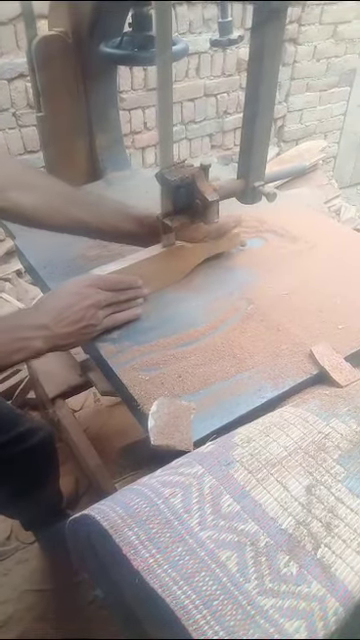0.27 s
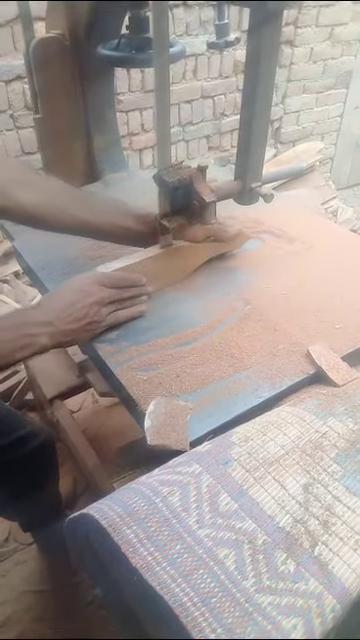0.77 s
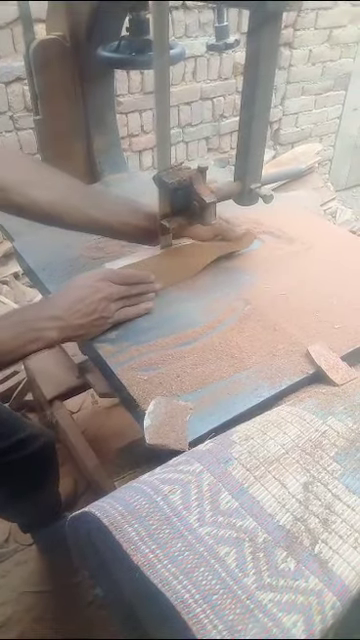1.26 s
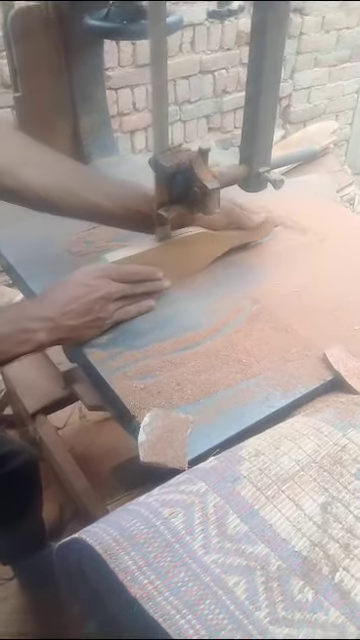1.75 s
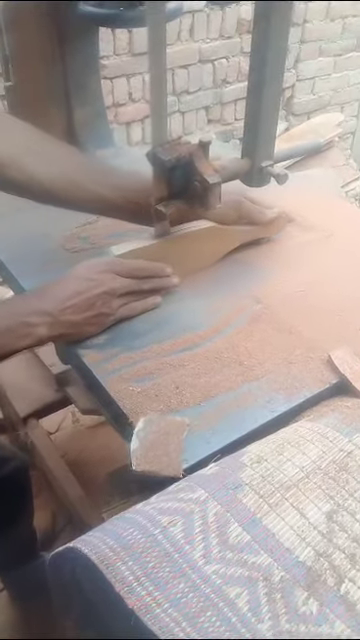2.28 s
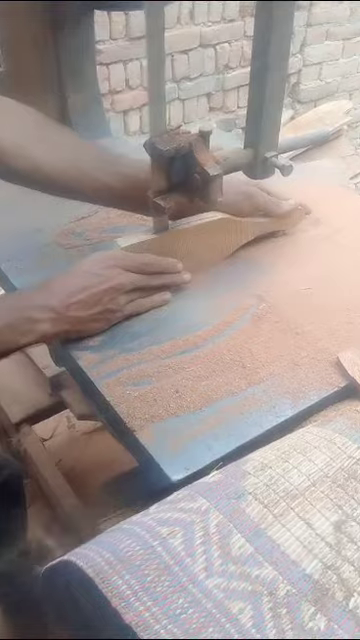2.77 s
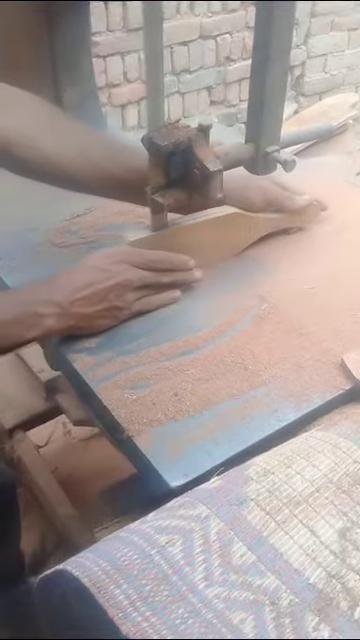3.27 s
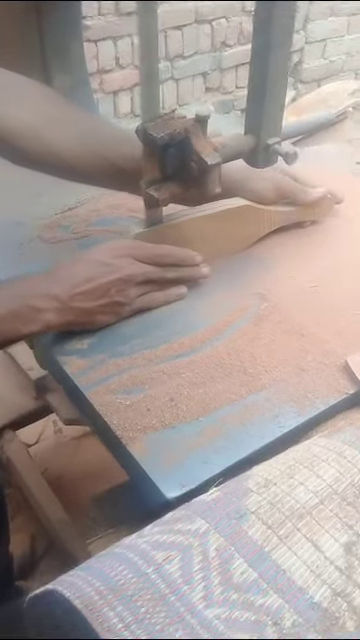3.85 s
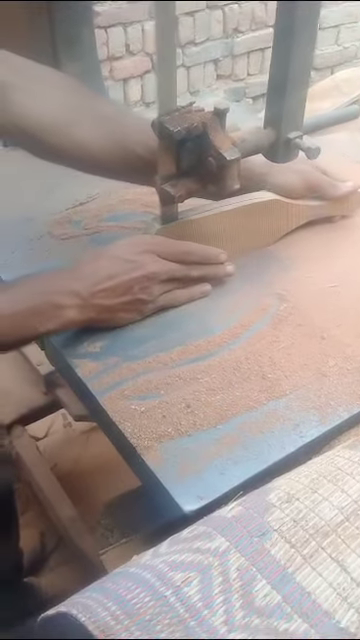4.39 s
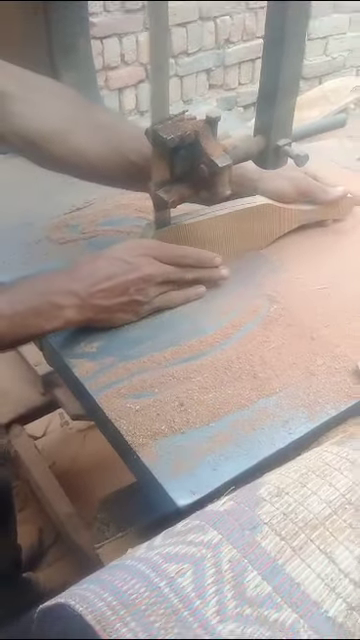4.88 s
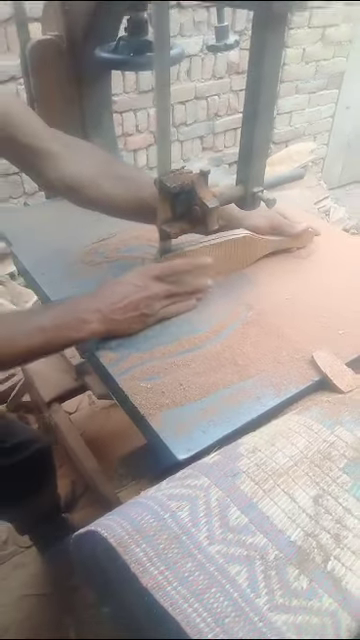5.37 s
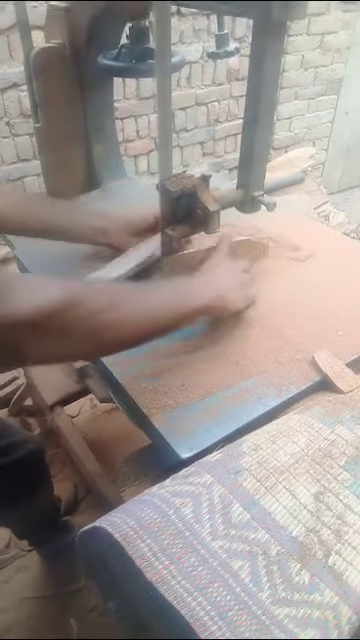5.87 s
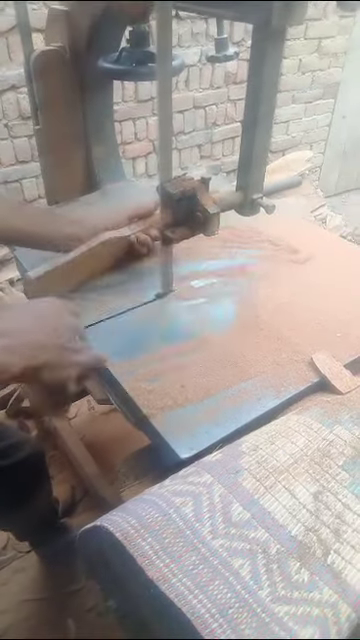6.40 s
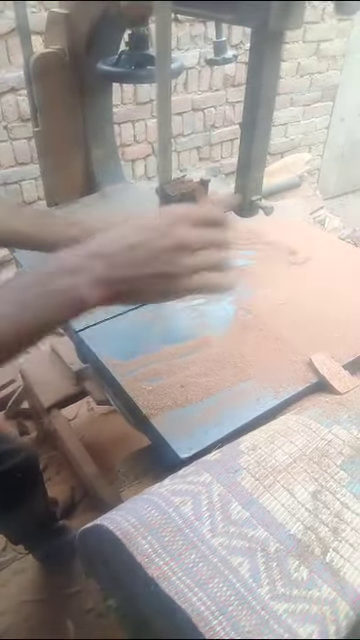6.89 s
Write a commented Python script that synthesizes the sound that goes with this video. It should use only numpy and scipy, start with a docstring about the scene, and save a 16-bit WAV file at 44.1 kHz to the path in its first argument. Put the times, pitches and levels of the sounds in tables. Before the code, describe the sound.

Close and dry on a phone: bandsaw teeth tear hardwood in uneven bursts, the ringing tone shifting as the cut moves, with low table shudder and gritty hiss. After a few seconds it eases to rattling frame, wavering hum and thin metallic squeaks. A loud double wooden clack and a softer, lower knock follow, then harsh cutting returns to the end.

```python
"""Band saw in a small workshop

A large band saw in a small brick workshop, on one phone microphone; levels are as they reach it, with no echo.
The blade bites into a hardwood blank, stutters, runs free while two offcuts knock, and bites again.
Random scratches, coloured by resonances, make the frame's rattle, the guides' scrape and the teeth's cut;
the motor hums as a wavering sine and offcuts ring as fading sines. The sound drops out near the start."""
import sys
import numpy as np
from scipy import signal
from scipy.fft import rfft, irfft, next_fast_len
from scipy.io import wavfile
from scipy.ndimage import uniform_filter1d

SR = 44100
rng = np.random.default_rng(int(sys.argv[2]) if len(sys.argv) > 2 else 0)


def master_out(mix):
    """Clip the mix to full scale and print it as 16-bit PCM to the path in sys.argv[1]."""
    frames = np.transpose(np.atleast_2d(mix))
    ceiling = np.clip(frames, -1, 1)
    pcm = np.round(ceiling * 32767).astype(np.int16)
    wavfile.write(sys.argv[1], SR, pcm)


N = 314874  # samples

# Spectra and modes below give relative levels: each coloured sound is scaled to rms 1 afterwards.
# Frame, wheels and motor running free, broad spectrum: pitch_hz, level_db (per Hz)
FRAME_SPECTRUM = [(15, -73), (25, -60), (98, -18), (171, -6.5), (220, -3.5), (358, -5.5), (785, -3.5),
                  (1060, 5.5), (1280, 0.5), (2940, -1), (3370, -0.5), (5880, -13), (6300, -16), (8190, -40),
                  (13900, -120)]
# Frame resonances: pitch_hz, width_hz, level_db
FRAME_MODES = [(100, 17, -3.5), (121.7, 15, -2), (506, 70, -1), (889, 62, 3.5), (1040, 52, 5),
               (1120, 150, 1.5), (1165, 57, 0), (1410, 74, 2.5), (1525, 69, 4.5), (1674, 54, 6.5),
               (2082, 62, 3.5), (2305, 390, 1), (3273, 86, 1.5), (3385, 44, 6), (3474, 38, 5),
               (4450, 580, 0)]
# Level of the frame's rattle: time_s, level_db
RATTLE_LEVEL = [(3.5, -24.5), (3.9, -22.5), (4.45, -23), (5.3, -22.5), (6.3, -24)]
# Wavering level of the motor hum: time_s, level_db (rms)
HUM_LEVEL = [(0.15, -37), (0.34, -41), (0.4, -51), (0.5, -34), (0.73, -41.5), (0.95, -34), (1.14, -41),
             (1.18, -47), (1.41, -35), (2.25, -47.5), (2.45, -32), (2.56, -47), (2.95, -34), (3.09, -44),
             (3.21, -30), (3.26, -48), (3.4, -36), (3.56, -48), (3.67, -34), (3.91, -35), (3.96, -45),
             (4.39, -60), (4.51, -40.5), (5.85, -37), (6.58, -48.5), (6.81, -68), (6.89, -48),
             (7.14, -43.5)]
# Blade rubbing through its guides, broad spectrum: pitch_hz, level_db (per Hz)
GUIDE_SPECTRUM = [(6200, -31), (6400, -7.5), (6900, -8), (7400, 2), (8700, -1), (11400, -9), (13400, -7),
                  (14000, -6)]
# Guide resonances: pitch_hz, width_hz, level_db
GUIDE_MODES = [(8000, 120, 6), (8560, 70, 2), (8760, 180, 0), (10600, 80, -6), (12700, 100, -16)]
# Rubbing in the guides before flutter: time_s, scrape_db
RUB_LEVEL = [(3.3, -33), (3.5, -28.5), (3.62, -44), (3.95, -30), (4.1, -29.5), (4.6, -30.5), (5.2, -27),
             (5.5, -29), (5.85, -32), (6.4, -29)]
# Wood fibres tearing, broad spectrum: pitch_hz, level_db (per Hz)
TEARING_SPECTRUM = [(300, -41), (700, -16), (1000, 2), (1500, 10), (2050, 2.5), (2700, 6.5), (3200, -3),
                    (3900, 1), (4600, -3), (5100, -16.5), (6000, -16.5), (7800, -48)]
# Blank shaking the table, broad spectrum: pitch_hz, level_db (per Hz)
THUD_SPECTRUM = [(25, -38), (60, -18.5), (150, -5.5), (300, -0.5), (500, -0.5), (750, -1.5), (1100, -17.5)]
# Table resonances: pitch_hz, width_hz, level_db
TABLE_MODES = [(410, 10.7, 9.5), (540, 27, 7.5)]
# Teeth scraping in the kerf, broad spectrum: pitch_hz, level_db (per Hz)
KERF_SPECTRUM = [(2820, -60), (4800, -12), (5140, -9.5), (5990, -6.5), (6610, -6), (7210, -5.5), (7790, 3),
                 (8170, 2.5), (9110, -3.5), (11600, -10), (13500, -5)]
# Kerf resonances: pitch_hz, width_hz, level_db
KERF_MODES = [(6840, 240, 0), (7900, 150, -10), (7660, 120, -4.5), (8520, 110, 1.5), (10100, 280, -1.5)]
# Offcuts knocking on the table: start_s, peak_db, pitch_factor
KNOCKS = [(4.2941, -2, 1.0), (4.2965, -7, 1.0), (5.0403, -10, .57)]
# Ringing of an offcut at pitch factor 1: pitch_hz, level_db (relative), t60_s (time to fall 60 dB)
OFFCUT_MODES = [(937, -13, .055), (1350, 0, .009), (2250, -3, .009)]
# Resonances where the band sings: pitch_hz, width_hz, level_db
SINGING_MODES = [(6562, 91, -7), (6673, 53, -7.5), (6970, 320, -13.5)]
# Topmost sizzle of guides and kerf, broad spectrum: pitch_hz, level_db (per Hz)
SIZZLE_SPECTRUM = [(12000, -32.5), (13500, 2), (14200, 0), (14800, 8), (15200, 7), (15800, 8)]
# Resonances of blank and blade that swell and fade as the kerf moves (the two times may be in either order):
# start_s, end_s, middle_hz, width_hz (nominal), level_db (over the tearing)
KERF_RINGS = [(-.3, .6, 2955, 120, -6), (-.2, .7, 1322, 40, -2.5), (-.2, .7, 1830, 90, -3.5),
              (-.2, 0.97, 1470, 100, 1), (.1, 1, 2710, 80, -8), (.3, 1.9, 2340, 100, -7.5),
              (.35, 1.5, 1343, 50, 0), (.45, 0.84, 4140, 100, -7), (.8, 1.3, 3910, 120, -10),
              (.5, 2.5, 10970, 260, -13.5), (.75, 1.6, 1477, 370, 0.5), (.75, 2, 1780, 95, -2),
              (1.1, 2.4, 1915, 60, -9.5), (1.3, 2.2, 2770, 365, -7.5), (1.4, 2.6, 1150, 70, -1),
              (1.5, 3.2, 893, 160, -5), (1.7, 3.6, 3540, 270, -6.5), (1.9, 2.6, 2410, 140, -5),
              (2., 2.76, 2150, 100, -4.5), (2.6, 3.1, 1330, 100, -4.5), (2.7, 3, 1125, 60, -2.5),
              (1.6, 2.9, 4540, 250, -10), (2.8, 3.3, 4580, 200, -6), (3.3, 3.65, 3470, 150, -1.5),
              (3.33, 3.4, 2215, 150, -2), (3.33, 3.8, 2730, 215, 2.5), (6.3, 6.75, 1476, 50, -2.5),
              (6.3, 6.75, 4720, 340, -4), (6.3, 6.9, 2980, 120, -2.5), (6.65, 7.3, 2875, 160, 0),
              (6.3, 7, 3770, 175, -3.5), (6.35, 7, 1850, 80, -4), (6.4, 7.1, 2410, 120, -4),
              (6.7, 7.4, 796.6, 25, -6.5), (6.7, 6.9, 1580, 80, -1.5), (6.8, 6.4, 4550, 365, -1.5),
              (6.5, 7.4, 5580, 490, -6.5), (1.4, 2.3, 1410, 45, -7.5), (2.8, 3.4, 5650, 250, -21),
              (-.2, 1.6, 1128, 25, -10.5)]
# The band presses on a guide: middle_s, scrape_db, sizzle_db
FLARES = [(3.39, -27, -32), (3.68, -30, -32), (4.2, -38, -33), (4.52, -30, -33), (4.7, -43, -35),
          (5.17, -25, -29), (5.44, -32, -27), (5.76, -28, -28), (6.0, -26, -31), (6.13, -40, -33),
          (6.26, -32, -35)]
# Bursts of singing, before flutter: middle_s, level_db
SQUEAKS = [(3.47, -28), (3.81, -30), (4.08, -22.5), (4.22, -29), (4.41, -25.5), (4.53, -28), (4.67, -30),
           (5.77, -30), (6.41, -26)]
# Steady feed under the bites, before judder: time_s, wood_db, thud_db, hiss_db, sizzle_db (over hiss)
FEED = [(0, -17.5, -37, -21, -2), (.3, -20, -38, -24, 1), (.47, -18, -35, -24, 3), (.6, -16, -28.5, -20, 0),
        (0.999, -17, -33.5, -22, 3), (1.5, -17.5, -31, -20.5, 0), (1.84, -16, -32, -20.5, 0),
        (1.86, -23, -42, -22, -3), (2.06, -24.5, -49, -30.5, 0), (2.36, -21.5, -46, -24, 2),
        (2.55, -21.5, -34, -23.5, -1), (2.69, -28, -44, -25, -1), (2.8, -20, -27, -20, -6),
        (2.866, -26, -36, -24, -3), (2.901, -21.5, -32.5, -20.5, 0), (3.26, -20, -34, -17.5, -6),
        (3.33, -39, -55, -40, -5), (3.6, -43.5, -55, -42, -8), (3.7, -70, -70, -70, 0),
        (6.3, -70, -70, -70, 0), (6.36, -33, -60, -31, -10), (6.41, -18, -48, -26, -2),
        (6.62, -18, -45, -23, 3), (6.65, -23, -37, -27, 7), (6.9, -23, -42, -27, 6),
        (7.001, -23, -43, -32, 10), (7.14, -19, -40, -24, 10)]
# The teeth bite harder, before judder: start_s, hold_s, wood_db, thud_db, hiss_db
BITES = [(0, .04, -18.5, -34, -20.5), (0.123, 0.061, -16, -32, -20.5), (0.207, 0.0088, -20, -24.5, -30),
         (0.311, 0.12, -15, -31.5, -22), (0.507, 0.09, -18, -35, -24), (0.749, 0.033, -24, -38, -30),
         (0.817, 0.048, -16.5, -28, -21), (0.918, 0.052, -17, -31, -30), (1.111, 0.076, -20, -32, -28),
         (1.25, 0.014, -21, -29, -31.5), (1.478, 0.032, -19, -36, -22.5), (1.58, 0.013, -19.5, -28, -23),
         (1.82, 0.016, -32, -30, -35), (1.914, 0.06, -17, -31, -20.5), (2.1, 0.062, -14.5, -26.5, -20.5),
         (2.273, 0.016, -14.5, -30, -22), (2.382, 0.061, -19, -29, -23), (2.447, 0.033, -14, -21.5, -26),
         (2.573, 0.048, -14, -26, -21), (2.73, 0.031, -15.5, -26, -19), (2.867, 0.0078, -19.5, -30, -20),
         (3.216, 0.034, -22, -26, -27), (3.362, 0.062, -22.5, -41, -25), (3.48, 0.037, -20, -46, -31),
         (6.447, 0.021, -18, -45, -22), (6.559, 0.044, -17, -36, -22), (6.674, .015, -18.5, -32, -30),
         (6.715, .02, -18, -32, -26), (6.776, 0.011, -19, -40, -27), (6.811, 0.045, -14, -32, -22),
         (6.902, 0.049, -14.5, -26.5, -27), (7.09, 0.041, -15, -27, -30.5)]

HUM_HZ, LOAD_SAG_HZ = 225.5, 1.99  # the motor slows a little while the teeth cut
SIZZLE_UNDER_DB, SIZZLE_FOLLOWS = -8, 1.5  # the sizzle lies under the scrape and swings wider
SING_DB = -33.5  # steady singing, before flutter
FLARE_S, SQUEAK_S = .03, .022  # from the middle to where the power is down to 1/e
BITE_RISE_S, BITE_FALL_DB_PER_S = 0.01, 302
SINK_PER_S = 0.037  # share of its middle pitch a ring loses each second as the kerf grows
DROPOUT_START_S, DROPOUT_END_S = .0332, .1366
EDGE_HZ = 15770  # upper band limit of the microphone signal


def gain_of(db):
    """Decibels to an amplitude factor."""
    return 10 ** (np.asarray(db) / 20)


def evened(x):
    """Scales to rms 1."""
    return x / np.sqrt(np.mean(x ** 2) + 1e-20)


def along(rows, t):
    """Reads the columns of a table at times t, in straight lines between rows."""
    s, *columns = np.transpose(rows)
    return [np.interp(t, s, c) for c in columns]


def colour(x, broad, modes=()):
    """Filters by a broad spectrum with resonance peaks summed on top in power; rms 1."""
    size = next_fast_len(len(x))
    hz = np.fft.rfftfreq(size, 1 / SR)
    f, db = np.transpose(broad)
    power = gain_of(2 * np.interp(np.log(hz + 1), np.log(f + 1), db))
    for mode_hz, width, mode_db in modes:
        power = power + gain_of(2 * mode_db) / (1 + (2 * (hz - mode_hz) / width) ** 2) ** 2
    return evened(irfft(rfft(x, size) * np.sqrt(power), size)[:len(x)])


def resonate(x, hz, width):
    """A resonance of gain 1 on a moving pitch: shifts the curve hz down to zero, smooths, shifts back."""
    turn = np.exp(2j * np.pi * np.cumsum(hz) / SR)
    r = np.exp(-np.pi * width / SR)
    return 2 * (turn * signal.lfilter([1 - r], [1, -r], x / turn)).real


def wobble(length, hz):
    """Slow random drift of rms 1 with rates up to about hz."""
    noise = uniform_filter1d(rng.standard_normal(length), round(SR / hz / 4))
    return evened(signal.lfilter([1], [1, -np.exp(-2 * np.pi * hz / SR)], noise))


def snags(per_s, fade_s):
    """Sudden rises at random moments that fade away; mean 0, rms 1."""
    jumps = rng.exponential(1, N) * (rng.random(N) < per_s / SR)
    rise = signal.lfilter([1], [1, -np.exp(-1 / (fade_s * SR))], uniform_filter1d(jumps, size=60))
    return evened(rise - rise.mean())


def scratches(length, per_s, spread_db, smooth):
    """Random clicks of uneven size over a share of smooth noise; rms 1."""
    struck = rng.random(length) < per_s / SR
    size = gain_of(spread_db * np.minimum(rng.exponential(1, length), 5)) * struck
    clicks = evened(size * rng.choice([-1., 1.], length))
    return evened(clicks + smooth * rng.standard_normal(length))


def patchy(x, depth_db, bins, frames):
    """Random patches of time and pitch swell and fade as the contact shifts; rms 1."""
    z = signal.stft(x, nperseg=512)[2]
    across_pitch = uniform_filter1d(rng.standard_normal(z.shape), bins, 0)
    field = uniform_filter1d(across_pitch, frames, 1)
    return evened(signal.istft(z * gain_of(depth_db * evened(field)), nperseg=512)[1][:len(x)])


def bumps(rows, half_s, t):
    """Power sum of bell-shaped swells, one curve of dB for each level column."""
    s, *columns = np.transpose(rows)
    coarse = t[::64]
    bell = np.exp(-((coarse - s[:, None]) / half_s) ** 2)
    return [np.interp(t, coarse, 10 * np.log10(gain_of(2 * db) @ bell + 1e-9)) for db in columns]


def machine():
    """The frame's resonances colour random scratches into a rattle; the motor hums as one sine."""
    t = np.arange(N) / SR
    rattle = colour(scratches(N, per_s=3000, spread_db=3.0, smooth=1.3), FRAME_SPECTRUM, FRAME_MODES)
    rattle = patchy(rattle, 1.36, 3, 24)
    rattle_db = along(RATTLE_LEVEL, t)[0] + 0.73 * wobble(N, hz=18.0)
    cutting = 1. * (along(FEED, t)[0] > -40)
    loaded = uniform_filter1d(cutting, SR // 2)  # speed changes over half a second
    hum_phase = 2 * np.pi * np.cumsum(HUM_HZ - LOAD_SAG_HZ * loaded) / SR
    hum = np.sqrt(2) * gain_of(along(HUM_LEVEL, t)[0]) * np.sin(hum_phase)
    return gain_of(rattle_db) * rattle + hum


def guides():
    """The steel band scrapes its guide blocks, fluttering; it sings and sizzles in bursts over a steady part."""
    t = np.arange(N) / SR
    rub_db, = along(RUB_LEVEL, t)
    flare_db, crackle_db = bumps(FLARES, FLARE_S, t)
    squeak_db, = bumps(SQUEAKS, SQUEAK_S, t)
    flutter_db = 2.1 * wobble(N, hz=14.)
    sizzle_db = SIZZLE_UNDER_DB + rub_db + SIZZLE_FOLLOWS * flutter_db + 1.6 * wobble(N, hz=14.)
    touch = patchy(scratches(N, per_s=4000, spread_db=1.0, smooth=0.99), 0.84, 5, 12)

    # bursts and steady parts add in power
    squeal_gain = np.hypot(gain_of(squeak_db), gain_of(SING_DB + 1.25 * wobble(N, hz=10.6)))
    squeal = squeal_gain * colour(touch, [(6000, -52.0), (8000, -42)], SINGING_MODES)
    scrape_power = gain_of(2 * (rub_db + flutter_db)) + gain_of(2 * flare_db) + gain_of(2 * -30.0)
    scrape = np.sqrt(scrape_power) * colour(touch, GUIDE_SPECTRUM, GUIDE_MODES)
    sizzle_power = gain_of(2 * sizzle_db) + gain_of(2 * crackle_db) + gain_of(2 * -43.0)
    sizzle = np.sqrt(sizzle_power) * colour(touch, SIZZLE_SPECTRUM)

    squeal_flicker = gain_of(1.2 * wobble(N, hz=26.0))
    rub_flicker = gain_of(0.74 * wobble(N, hz=45.) + 1.1 * snags(per_s=45.0, fade_s=.015))
    return squeal_flicker * squeal + rub_flicker * (scrape + sizzle)


def knock(peak_db, pitch):
    """A small block of wood rings briefly and radiates little bass; a lower pitch rings longer."""
    t = np.arange(6000) / SR
    ring = 0
    for hz, level_db, t60 in OFFCUT_MODES:
        decay = 1000 ** (-t * pitch / t60)
        ring = ring + gain_of(level_db) * decay * np.sin(2 * np.pi * hz * pitch * t)
    less_bass = signal.butter(2, 500 * pitch, "highpass", fs=SR, output="sos")
    ring = signal.sosfilt(less_bass, ring * np.minimum(t / .0004, 1))  # 0.4 ms onset
    return gain_of(peak_db) * ring / abs(ring).max()


def pressure(t):
    """Gains of wood, thud and hiss: the steady feed plus bites that rise fast, hold and die away."""
    start, hold, *bite_db = np.transpose(BITES)
    coarse = t[::32]
    since = coarse - start[:, None]
    rise = np.clip(since / BITE_RISE_S, 0, 1)
    falling_s = np.clip(since - BITE_RISE_S - hold[:, None], 0, 1)
    shape = rise * gain_of(-BITE_FALL_DB_PER_S * falling_s)
    return [np.interp(t, coarse, np.sqrt(gain_of(2 * feed_db) + gain_of(2 * db) @ shape ** 2))
            for feed_db, db in zip(along(FEED, coarse), bite_db)]


def blank(bites, t):
    """The bites tear fibres and drive each resonance while it lasts; the level stays even as rings join."""
    sound, power = colour(bites, TEARING_SPECTRUM), np.ones(len(t))
    for k, (start, end, middle_hz, width, db) in enumerate(KERF_RINGS):
        share = np.clip((t - start) / (end - start), 0, 1)
        live = np.flatnonzero((share > 0) & (share < 1))
        if len(live) > 1:
            swell = gain_of(db) * np.sqrt(np.sin(np.pi * share[live]))
            waver = 1 + .006 * wobble(len(live), hz=10.)
            hz = middle_hz * (1 - SINK_PER_S * (t[live] - (start + end) / 2)) * waver
            # the same train of bites, shifted in time, so that overlapping rings add in power
            drive = np.roll(bites, 500 * (k + 1))[live]
            ring = resonate(resonate(drive, hz, 1.3 * width), hz, 1.3 * width)
            sound = sound + np.pad(swell * evened(ring), (live[0], len(t) - live[-1] - 1))
            power[live] += swell ** 2
    return patchy(sound / np.sqrt(power), .8, 4, 10)


def cut():
    """Teeth strike at random: one train of bites rings the blank, shakes the table and hisses in the kerf."""
    t = np.arange(N) / SR
    wood_gain, thud_gain, hiss_gain = pressure(t)
    judder_db = 0.72 * wobble(N, hz=40.) + 0.85 * snags(per_s=40., fade_s=0.021) + 0.61 * wobble(N, hz=19.0)
    bites = scratches(N, per_s=2500, spread_db=2.5, smooth=0.67)
    thud = thud_gain * gain_of(2.33 * wobble(N, hz=11.4)) * colour(bites, THUD_SPECTRUM, TABLE_MODES)
    rasp = patchy(bites + 2.0 * rng.standard_normal(N), 2.1, 5, 30)
    sizzle_db = along(FEED, t)[3] + 1.2 * wobble(N, hz=12.)
    hiss = colour(rasp, KERF_SPECTRUM, KERF_MODES) + gain_of(sizzle_db) * colour(rasp, SIZZLE_SPECTRUM)
    return gain_of(judder_db) * (wood_gain * blank(bites, t) + thud + hiss_gain * hiss)


def scene():
    """All sources reach one microphone, the same on both channels."""
    mix = machine() + guides() + cut()
    for start_s, peak_db, pitch in KNOCKS:
        mix[round(start_s * SR):][:6000] += knock(peak_db, pitch)
    return np.array([mix, mix])


def record(dry):
    """The sound drops out, leaving a faint dying trace; peaks clip; then the band limit."""
    t = np.arange(N) / SR
    trace = gain_of(-25 - 1800 * np.clip(t - DROPOUT_START_S, 0, 1))  # falls 1800 dB per second
    dropped = (t > DROPOUT_START_S) & (t < DROPOUT_END_S)
    heard = dry * np.where(dropped, trace, 1)
    band = signal.firwin(2001, EDGE_HZ, window=("kaiser", 9), fs=SR)
    return signal.oaconvolve(np.clip(heard, -1, 1), band[None], "same")


dry = scene()
out = record(dry)
master_out(out)
```